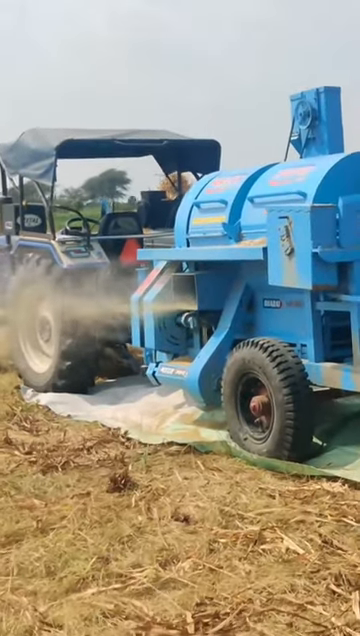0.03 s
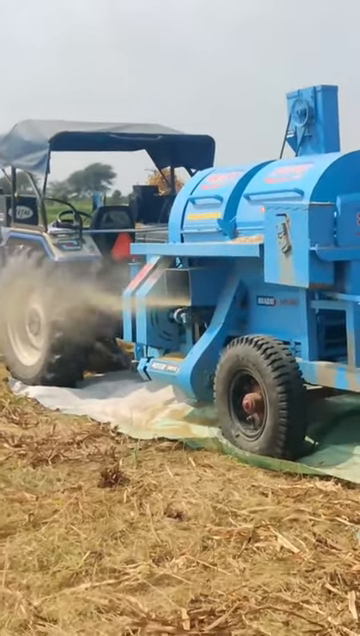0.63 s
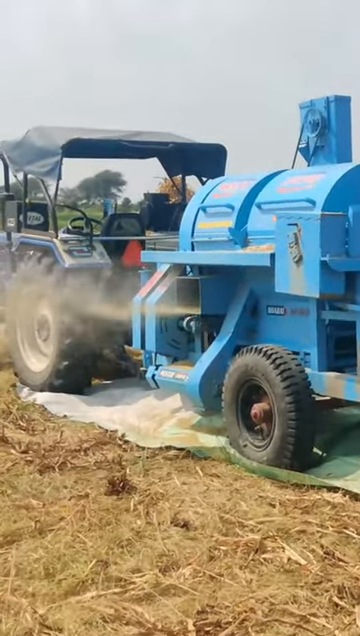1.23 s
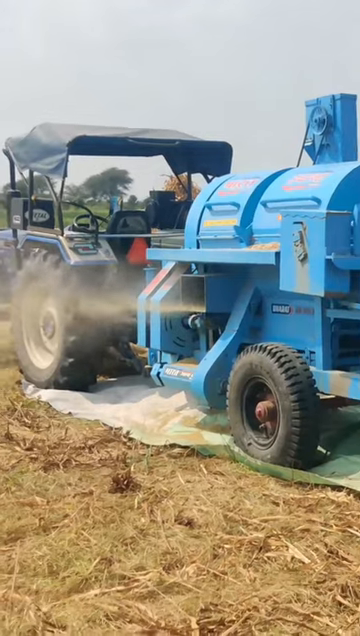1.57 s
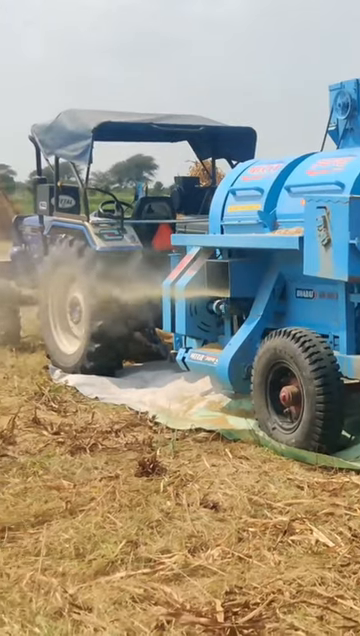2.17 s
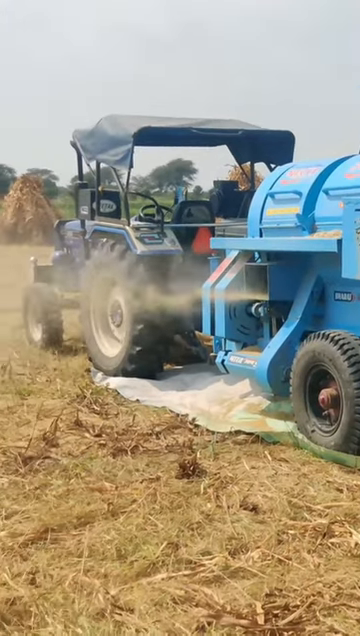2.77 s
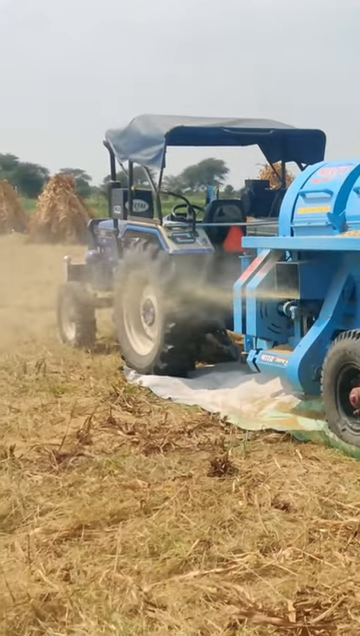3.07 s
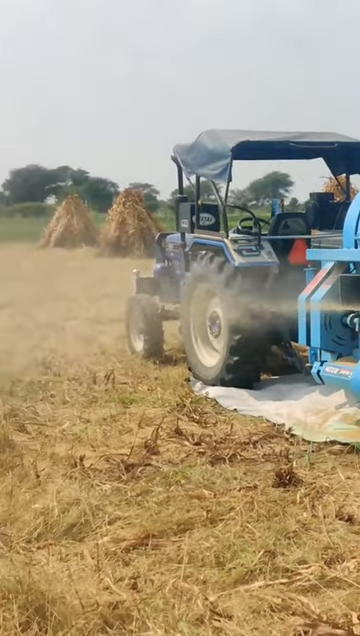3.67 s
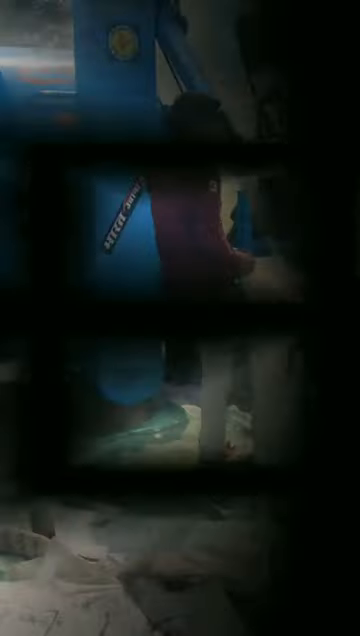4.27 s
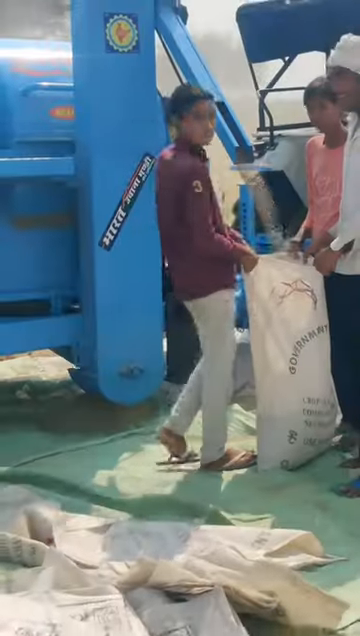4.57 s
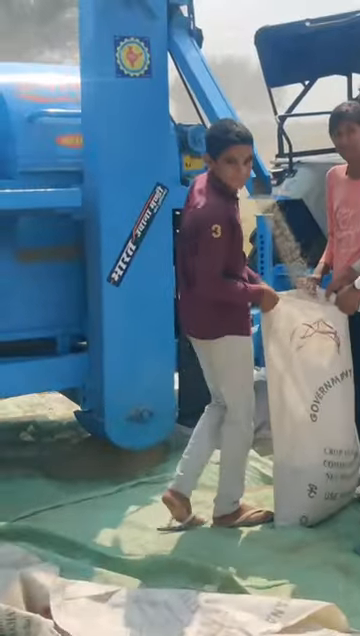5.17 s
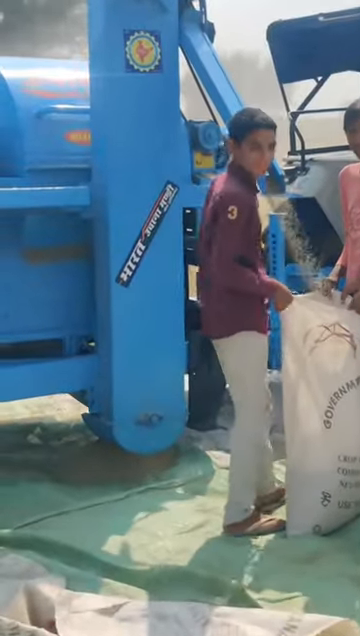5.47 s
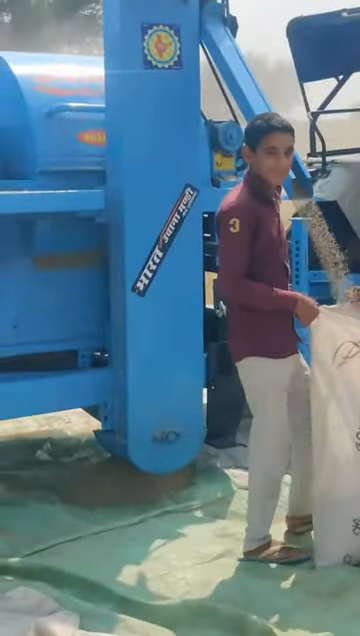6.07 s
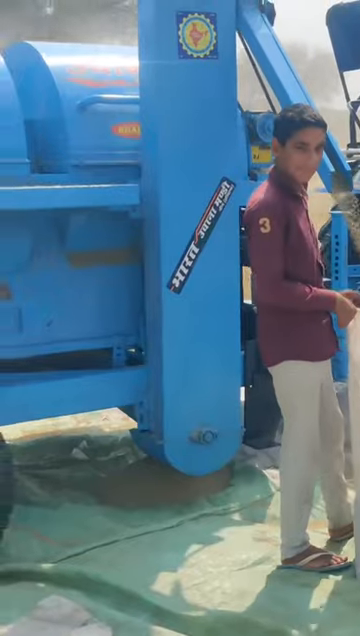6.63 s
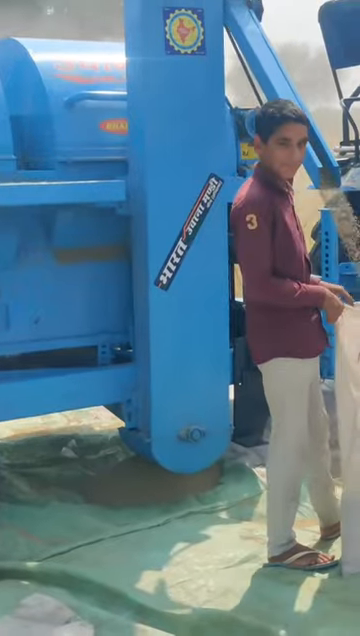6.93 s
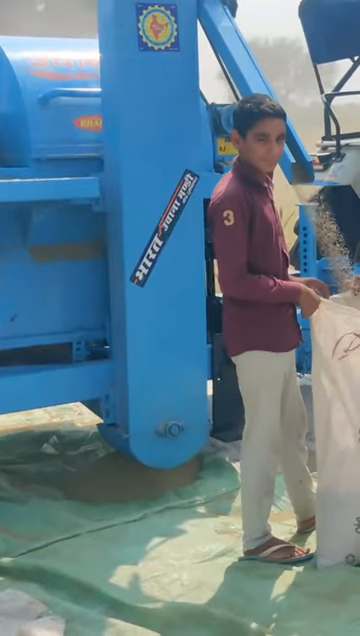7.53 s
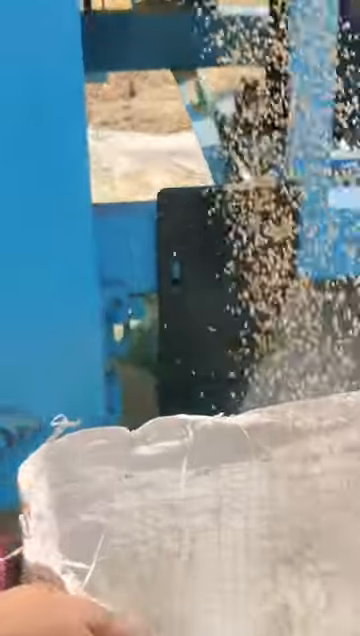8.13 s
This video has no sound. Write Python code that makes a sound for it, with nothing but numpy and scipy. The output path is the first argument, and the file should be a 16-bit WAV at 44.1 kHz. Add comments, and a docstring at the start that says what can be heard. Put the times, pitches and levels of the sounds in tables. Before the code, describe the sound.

A diesel tractor runs with a deep, steady throb while a threshing machine roars beside it in an open field. The drum beats rapidly and rattles its steel cover, a blower hums, and chaff hisses. About halfway, a few sharp clicks and thumps bring a closer, hissier sound with wind buffeting the microphone. Near the end, after another click, grain patters more clearly into a sack.

```python
"""A deep diesel throb comes first, then the din of the threshing machine that the tractor drives.
Four cylinders send puffs through a silencer. The drum beats straw seven to ten times a second, which
swells a roar and rings its steel cover; the casing booms, a blower hums, chaff hisses, grain patters.
A breeze over the open field buffets the microphone ports. The scene is heard from three places in turn:
a few metres off on the chaff side, then on the grain side, then right at the sack."""
import sys
import numpy as np
from scipy import signal
from scipy.fft import rfft, irfft, next_fast_len
from scipy.io import wavfile
from scipy.ndimage import uniform_filter1d, map_coordinates

SR = 44100
rng = np.random.default_rng(int(sys.argv[2]) if len(sys.argv) > 2 else 0)


def generate_wav(signal):
    """Clip the signal to [-1, 1] and save it as 16-bit WAV at the path in sys.argv[1]."""
    frames = np.transpose(np.atleast_2d(signal))
    scaled = np.clip(frames, -1, 1) * 32767
    pcm = np.round(scaled).astype(np.int16)
    wavfile.write(sys.argv[1], SR, pcm)


N = 366030
T = np.arange(N) / SR

# the thresher at each place: (boom [dB], boom drift [dB/s], roar [dB], hiss [dB], hiss left - right [dB])
LEVELS = [(-28.5, -0.5, -32.5, -36.3, -3), (-26.5, 0.67, -31, -31, -0.5), (-24, 0.5, -29, -30, .8)]
# wads of straw swell the din as they pass the drum, gaps in the feed thin it:
# (time [s], half length [s], boom rise [dB], roar rise [dB], hiss rise [dB])
WADS = [(0.502, 0.073, 1, 0, 0), (1.923, 0.14, 1, 1.3, 0), (3.047, 0.031, -5, -3.5, -2.5),
        (3.2, 0.4, -0.5, -0.4, 0.5), (3.503, 0.023, -1, -2, -2), (3.986, 0.062, 3, -2.5, 0),
        (4.086, 0.049, 7, 0, 2), (4.217, 0.072, 7, -0.5, 0), (4.573, 0.11, 5, 0, 0.5),
        (4.91, 0.055, 4, -1, 0), (6.5, 0.61, 1, 0.4, 1.14), (7.2, 0.25, 0.7, 0.3, 0.4),
        (7.97, 0.33, 3.5, 0.4, 1.5)]


def exhaust(stay, place, scatter_db=0.56, jitter_s=.00007, upper_hz=190, waver_db=1.4):
    """Source and filter: one puff per firing excites the silencer; the upper harmonics waver in level."""
    # the governor pulls the engine towards its set speed; per place:
    # (first firing rate [Hz], settled rate [Hz], time constant [s], head start [firings])
    governor = [(43.3, 44.32, 5.52, .28), (43, 43.87, 0.3546, .83), (43.34, 43.5, 0.86, 0.835)]
    # each cylinder's puff: (strength [dB], relative delay along its manifold branch [s])
    cylinders = [(1.0, .00032), (1.45, -.00016), (1.5, .00014), (1, -.00028)]
    # exhaust tone per place: (frequency [multiples of the firing rate], relative level [dB])
    orders = [
        [(1, 2.5), (1.5, 9), (2, 0.5), (3, -8), (4, -14.5), (5, -18), (6, -15), (6.5, -15), (7, -22), (8, -32),
         (9, -32), (10, -42.5)],
        [(1, 2), (1.3, 5), (2, -4), (3, -19.5), (4, -10), (5, -30.5), (6, -18.5), (6.5, -13), (7, -18.5),
         (8, -29), (9, -27.5), (10, -30.5)],
        [(1, 5), (2, -5.5), (3, -13.5), (4, -34), (6, -13), (8, -15), (10, -41)],
    ]
    # puffs arrive as pushes on the chaff side, as pulls on the grain side; per place: (sign [+1 or -1])
    polarity = [1, -1, -1]
    first_hz, settled_hz, settle_s, head_start = governor[place]
    run_up = SR // 10  # the engine is already running
    t = T[stay] - T[stay][0]
    t = np.concatenate([t[:run_up] - run_up / SR, t])
    firing_hz = settled_hz + (first_hz - settled_hz) * np.exp(-t / settle_s)
    firings = head_start + np.cumsum(firing_hz) / SR
    count = np.arange(1, int(firings[-1]) + 1)
    strength_db, delay_s = np.take(cylinders, count, axis=0, mode="wrap").T
    jitter, scatter = rng.standard_normal((len(count), 2)).T
    onset_s = np.interp(count, firings, t - t[0]) + delay_s + jitter_s * jitter
    onsets = np.clip(onset_s * SR, 0, len(t) - 1).astype(int)
    puffs = np.bincount(onsets, amp(strength_db + scatter_db * scatter), len(t))
    tones = [(order * firing_hz.mean(), db) for order, db in orders[place]]
    pipe = [(5, -2), (25, -0.6)] + tones + [(600, -45.0), (1500, -68), (4000, -100)]
    smeared = filtered(puffs - puffs.mean(), silencer_chamber)
    throb = signal.fftconvolve(smeared, minimum_phase(pipe))[run_up:len(t)]
    upper = filtered(throb, lambda hz: 1 - 1 / (1 + (hz / upper_hz) ** 8))
    return polarity[place] * unit(throb - upper + amp(waver_db * wobble(4)[stay]) * upper)


def silencer_chamber(hz, resonance_hz=261, width_hz=45):
    """All-pass response: group delay near resonance smears each puff without changing its spectrum."""
    pole = resonance_hz ** 2 - hz ** 2 + 1j * hz * width_hz
    return np.conj(pole) / pole


def drum_beat(stay, turn_hz, first_s, sharpness=14, uneven=0.25):
    """Periodic forcing: once a turn the drum bites the straw with varying force; a zero-mean envelope."""
    phase = 2 * np.pi * turn_hz * (T[stay] - T[stay][0] - first_s)
    bite = np.exp(sharpness * (np.cos(phase) - 1)) * (1 + uneven * wobble(7.4)[stay])
    return bite - bite.mean()


def casing_boom(stay, place, beat_db, beat_share=0.25):
    """Forced vibration: the casing booms with low noise that swells with the drum's beats and load."""
    # boom spectrum per place: (frequency [Hz], relative density [dB])
    spectra = [
        [(20, -17), (50, -4.5), (100, -5), (190, -2.5), (235, -9), (275, -9.5), (350, -15), (480, -22),
         (700, -37), (1200, -100)],
        [(20, -23), (50, 3), (120, 1), (185, 0), (250, -4), (290, -1.5), (370, -8), (480, -14.5), (700, -66),
         (1200, -100)],
        [(20, -8), (60, 8), (120, -9), (165, 5), (200, 2.5), (275, 6), (315, 0), (345, 6.5), (372, -6),
         (395, 0.5), (520, -16), (700, -34), (1200, -100)],
    ]
    boom_db, drift_db_per_s = LEVELS[place][:2]
    load_db = swells(stay, WADS, column=2) + drift_db_per_s * (T[stay] - T[stay][0])
    return amp(boom_db + load_db + beat_share * beat_db) * rush(stay, spectra[place], patchy_db=.5)


def threshing_roar(stay, place, beat_db):
    """Amplitude modulation: beats and wads swell a midrange noise that reaches the left port first."""
    # roar spectrum per place: (frequency [Hz], relative density [dB])
    spectra = [
        [(280, -29), (480, -9.5), (545, -8.5), (590, -0.5), (651, -0.5), (774, -1), (997, -11.5), (1040, -16.5),
         (1115, -9.5), (1230, -9), (1400, -14.5), (1650, -12), (1900, -19), (2470, -26.5), (4180, -120)],
        [(280, -35), (480, -4.5), (539, -4), (644, 1), (735, 1.5), (958, 0), (1170, -9), (1380, -3.5),
         (1680, -10.5), (1900, -16), (2470, -27), (4180, -120)],
        [(350, -11), (450, 2.5), (590, -3), (700, 0.5), (760, 3.5), (839, 0.5), (1060, -2), (1280, -9),
         (1900, -11.5), (2470, -40), (4180, -120)],
    ]
    # paths per place: (lead at the left port [s], share scattered by nearby panels [0-1])
    arrival = [(0.000062, 0.02), (0.000066, 0.072), (.00003, .35)]
    lead_s, scattered = arrival[place]
    roar_db = LEVELS[place][2] + swells(stay, WADS, column=3) + beat_db
    roar = amp(roar_db) * rush(stay, spectra[place], patchy_db=.5, scattered=scattered)
    return filtered(roar, lambda hz: np.exp(1j * np.pi * lead_s * np.outer([1, -1], hz)))


def sieves(stay, place, beat_db, grain_db, bounce, beat_share=0.1):
    """Incoherent summation: the chaff and grain shaken from the sieves merge into a steady hiss."""
    # chaff and grain spectrum per place: (frequency [Hz], relative density [dB])
    spectra = [
        [(900, -35), (1900, -10), (2400, -6.5), (2900, -7.5), (4100, -4.5), (5400, -3.5), (6300, 1.5),
         (7000, -6), (7900, -14.5), (9300, -10.5), (10600, -15.5), (14000, -14), (15400, -19)],
        [(900, -44), (1900, -5), (2300, -3), (3400, -4.5), (4200, -2.5), (5500, -2), (6400, 2.5), (7000, -5),
         (7700, -11), (9500, -14.5), (11300, -7.5), (13500, -13), (15400, -11)],
        [(950, -22), (1850, -9.5), (2450, -5.5), (3250, -6.5), (5450, -4), (6350, 0), (7150, -6), (8400, -14.5),
         (10100, -15.5), (12400, -14), (14200, -18), (15450, -17)],
    ]
    hiss_db, pan_db = LEVELS[place][3:]
    chaff = rush(stay, spectra[place], patchy_db=1.43, bounce=bounce)
    pour = chaff + amp(grain_db) * grain(stay, spectra[place])
    balance = amp(np.outer([1, -1], pan_db) / 2)
    pour = unit(pour / pour.std(axis=1, keepdims=True) * balance)
    flicker_db = 0.34 * wobble(90)[stay]
    return amp(hiss_db + swells(stay, WADS, column=4) + beat_share * beat_db + flicker_db) * pour


def grain(stay, spectrum, per_second=1400, size_db=2.2):
    """Shot noise: single kernels tick on the chute and the sack at random times and directions."""
    n = len(T[stay])
    when, size, direction = rng.random((int(per_second * n / SR), 3)).T
    strengths = amp(size_db * np.minimum(-np.log(1 - size), 4))
    angle = 2 * np.pi * direction
    onsets = (when * n).astype(int)
    ticks = [np.bincount(onsets, strengths * share, n) for share in (np.cos(angle), np.sin(angle))]
    return spread(np.array(ticks), spectrum)


def cover(blows, attack_s=0.0035, vary_db=1.5, detune=0.021):
    """Modal ringing: each blow (time [s], level [dB]) excites its own mix of the drum cover's modes."""
    # modes of the sheet steel: (frequency [Hz], relative level [dB], t60 [s])
    modes = [(606, -3.5, 0.096), (657, -1, 0.094), (775, -1.5, .08), (934, -9.5, 0.086), (1375, -15, 0.071)]
    t = np.arange(SR // 8) / SR
    hz, mode_db, t60 = np.transpose(modes)[:, :, None]
    out = np.zeros(N + SR)
    for s, db in blows:
        loud, sharp, phase = rng.standard_normal((3, len(modes), 1))
        decay = amp(db + mode_db + vary_db * loud - 60 * t / t60)
        ring = decay * np.sin(2 * np.pi * (hz * (1 + detune * sharp) * t + phase))
        out[max(round(s * SR), 0):][:len(t)] += ring.sum(0) * (1 - np.exp(-t / attack_s))
    return out[:N]


def drum_rattle(stay, turn_hz, first_s, db, lead_s=0.00399):
    """Periodic impact: the cover rings once a turn, as the beaters meet the straw."""
    turns = np.arange(T[stay][0] + first_s - lead_s, T[stay][-1], 1 / turn_hz)
    return cover([(s, db) for s in turns])[stay]


def hard_bites():
    """Impulse excitation: tough straw makes the drum bite harder and ring its cover."""
    # blows on the cover: (time [s], level [dB])
    bites = [(.767, -25), (1.666, -25), (1.761, -28), (1.856, -22.5), (1.957, -25), (2.263, -24),
             (2.747, -26.5), (2.844, -29), (3.341, -25), (3.636, -26), (3.738, -26), (5.917, -25),
             (6.057, -26), (6.15, -26), (6.751, -27), (7.086, -25), (7.821, -26), (7.96, -23.5)]
    return cover(bites)


def blower(stay, slip_rad=0.57):
    """Phase modulation: the harmonics of the winnowing fan waver as its belt slips a little."""
    # fan harmonics: (frequency [Hz], relative level [dB])
    harmonics = [(31.2, -35), (62.4, -24), (93.6, -30.5)]
    slip = slip_rad * wobble(1.386)[stay]
    tones = [amp(db) * np.sin(2 * np.pi * hz * T[stay] + k * slip)
             for k, (hz, db) in enumerate(harmonics, 1)]
    return np.sqrt(2) * sum(tones)


def clicks(click_t60=0.012, tone_t60=.06, attack_s=.001):
    """Transients: each sharp broadband click comes with a damped sine, a low thump or a faint ping."""
    # the first and last fall as the listening place switches, the others on the grain side:
    # (time [s], click peak [dB], tone frequency [Hz], tone level [dB])
    events = [(3.9098, -11, 112, -5.5), (4.0735, -14, 165, -6.5), (4.1749, -17, 130, -13),
              (5.265, -25, 1300, -25), (7.599, -17, 120, -14)]
    # click spectrum: (frequency [Hz], relative density [dB])
    spectrum = [(100, -17), (400, 9), (900, 8), (2000, -8), (3500, -5), (6500, -27), (15000, -17)]
    t = np.arange(SR // 10) / SR
    out = np.zeros((2, N))
    for s, click_db, hz, tone_db in events:
        click = spread(rng.standard_normal((2, len(t))) * amp(-60 * t / click_t60), spectrum)
        click /= np.abs(click).max()
        tone = -np.sin(2 * np.pi * hz * t) * amp(-60 * t / tone_t60) * (1 - np.exp(-t / attack_s))
        out[:, round(s * SR):][:, :len(t)] += amp(click_db) * click + amp(tone_db) * tone
    return out


def rasp(at_s=3.99, half_s=0.07, db=-32):
    """Friction noise: a tough wad rubs briefly against the drum's grate."""
    # rasp spectrum: (frequency [Hz], relative density [dB])
    spectrum = [(500, -32), (780, 0), (930, 0), (1030, -3), (1200, -23), (2500, -50)]
    return amp(db) * np.exp(-((T - at_s) / half_s) ** 4) * rush(slice(0, N), spectrum, patchy_db=1)


def wind(stay, lumps_db=-4.0):
    """Turbulent pressure: eddies buffet each port independently, rising with the breeze and its gusts."""
    # eddy spectrum: (frequency [Hz], relative density [dB])
    spectrum = [(4, -14), (13, 3), (25, 0), (45, 0), (70, -3.5), (160, -12.5), (220, -19.5), (300, -26),
                (450, -37), (1500, -100)]
    # slow course of the buffeting: (time [s], level [dB])
    breeze = [(0, -30), (2.4, -29.5), (3.2, -44), (3.88, -55), (3.93, -24.5), (5.25, -21.5), (6.5, -35),
              (7.4, -31), (8.3, -41)]
    # gusts: (time [s], half length [s], rise [dB])
    gusts = [(1.178, 0.13, 4), (4.21, 0.12, 6)]
    level_db = np.interp(T[stay], *np.transpose(breeze)) + swells(stay, gusts)
    eddies = filtered(rng.standard_normal((2, len(T[stay]))), lambda hz: amp(along(spectrum, hz)))
    lumps = amp(lumps_db * np.array([wobble(11)[stay], wobble(4.5)[stay]]))
    return amp(level_db) * unit(eddies * lumps)


def rush(stay, spectrum, patchy_db, bounce=0, scattered=0, fine_hz=7500):
    """Modulated stereo noise of rms 1: brief patches of gain, deepest in the high treble."""
    n = len(T[stay])
    hz, _, bins = signal.stft(rng.standard_normal((2, n)), SR, nperseg=512)
    patches = uniform_filter1d(rng.standard_normal(bins.shape[1:]), size=5, axis=0)
    patches = uniform_filter1d(patches, size=6, axis=1)
    treble = (1 - 1 / (1 + (hz / fine_hz) ** 8))[:, None]
    gain_db = patchy_db * (1 + treble) * patches / patches.std()
    noise = signal.istft(bins * amp(gain_db), nperseg=512)[1][:, :n]
    return spread(noise, spectrum, bounce, scattered=scattered)


def spread(pair, spectrum, bounce=0, bounce_s=0.001676, stubble_hz=4300, scattered=0):
    """Partial coherence: a direct signal with its ground echo and a diffuse one mix at the two ports."""
    # likeness of left and right: (frequency [Hz], coherence [0-1])
    coherence = [(300, 1), (500, 0.82), (650, 0.94), (820, 0.97), (980, 0.67), (1300, 0.056), (2200, 0.069),
                 (4500, 0), (5900, 0.021), (6400, 0.36), (7300, 0.73), (7900, 0.052), (9000, 0.49),
                 (12500, 0.5), (15000, 0.43)]
    # colour of the microphone ports: (frequency [Hz], left - right [dB])
    ports = [(400, 0.5), (1300, -1.5), (2600, -5.5), (3600, -8), (5000, -7), (5800, -16), (6400, -13.5),
             (7000, -7.5), (7600, -9.5), (8800, 0.5), (10000, -3.5), (12500, -3.5), (14500, -1.5)]

    def mixing(hz):
        alike = np.clip(along(coherence, hz) * (1 - scattered), -.99, .99)
        lean = amp(along(ports, hz) / 2)
        echo = bounce / (1 + (hz / stubble_hz) ** 6)  # stubble scatters the treble
        direct = np.sqrt(1 + alike) * (1 + echo * np.exp(-2j * np.pi * hz * bounce_s))
        diffuse = np.sqrt(1 - alike)
        colour = amp(along(spectrum, hz)) / np.sqrt(lean ** 2 + lean ** -2 + 2 * alike)
        return colour * np.array([[lean * direct, lean * diffuse], [direct / lean, -diffuse / lean]])
    return unit(filtered(pair, mixing).sum(1))


def swells(stay, rows, column=2):
    """Gaussian bumps summed in dB, from rows of (time [s], half length [s], rises [dB])."""
    return sum(row[column] * np.exp(-((T[stay] - row[0]) / row[1]) ** 2) for row in rows)


def wobble(rate):
    """A smooth random curve: a spline through rate knots a second."""
    return map_coordinates(rng.standard_normal(int(N * rate / SR) + 4), [T * rate])


def filtered(x, response):
    """Linear filtering: the spectrum of x times a frequency response."""
    size = next_fast_len(x.shape[-1] + 8192)
    return irfft(rfft(x, size) * response(np.fft.rfftfreq(size, 1 / SR)), size)[..., :x.shape[-1]]


def minimum_phase(points, size=16384):
    """Cepstral folding gives the causal impulse response of (frequency [Hz], gain [dB]) points."""
    cepstrum = irfft(np.log(amp(along(points, np.fft.rfftfreq(size, 1 / SR)))))
    cepstrum[1:size // 2] *= 2
    cepstrum[size // 2 + 1:] = 0
    return irfft(np.exp(rfft(cepstrum)))


def along(points, hz):
    """Interpolation of (frequency [Hz], value) points on a logarithmic axis."""
    knots_hz, values = np.transpose(points)
    return np.interp(np.log(hz + 1), np.log(knots_hz + 1), values)


def unit(x):
    """Normalisation to rms 1 at the centre of the stereo image."""
    return x / np.sqrt(np.mean(np.atleast_2d(x).mean(0) ** 2) + 1e-20)


def amp(db):
    """Decibels to amplitude ratio."""
    return 10 ** (np.asarray(db) / 20)


def scene():
    """Superposition: both machines and the breeze run on while the listening place changes abruptly."""
    # moves to the next place: (time [s])
    moves = [3.91, 7.602]
    # per place: (exhaust [dB], blower gain [dB], drum rate [Hz], first beat [s], beat depth [dB],
    # cover ring [dB], grain re chaff [dB], ground echo [ratio])
    places = [(-14, -4.5, 10.105, 0.081, 1.5, -32, -16, 0.32),
              (-14.5, -2.5, 10.475, 0.044, 1, -31, -11, 0.02), (-14, -2, 6.9, 0.057, 1, -32, -7, .05)]
    edges = [0] + [round(s * SR) for s in moves] + [N]
    parts = []
    for place, settings in enumerate(places):
        exhaust_db, blower_db, turn_hz, first_s, depth_db, ring_db, grain_db, bounce = settings
        stay = slice(edges[place], edges[place + 1])
        engine = amp(exhaust_db) * exhaust(stay, place)
        buffet = wind(stay)
        beat_db = depth_db * drum_beat(stay, turn_hz, first_s)
        din = casing_boom(stay, place, beat_db) + threshing_roar(stay, place, beat_db)
        hiss = sieves(stay, place, beat_db, grain_db, bounce)
        rattle = drum_rattle(stay, turn_hz, first_s, ring_db)
        hum = amp(blower_db) * blower(stay)
        parts.append(engine + din + hiss + rattle + hum + buffet)
    return np.concatenate(parts, axis=1) + hard_bites() + clicks() + rasp()


def record(dry, ceiling=.95, top_hz=15480):
    """Soft saturation rounds the highest peaks; a sharp low-pass limits the band."""
    rounded = dry / (1 + np.abs(dry / ceiling) ** 12) ** (1 / 12)
    return filtered(rounded, lambda hz: hz < top_hz)


dry = scene()
out = record(dry)
generate_wav(out)
```